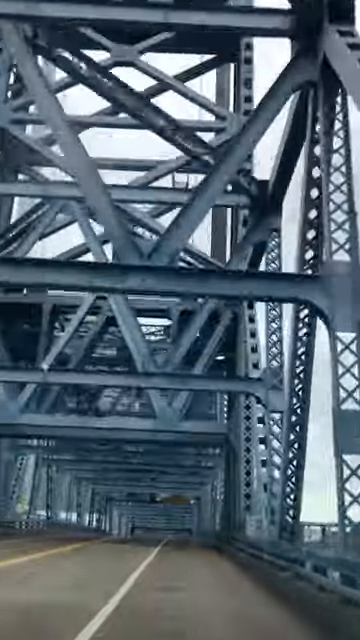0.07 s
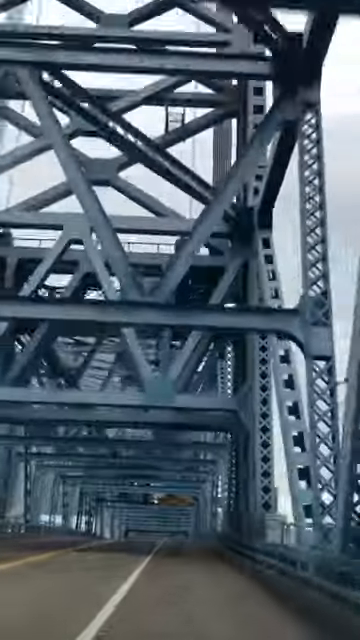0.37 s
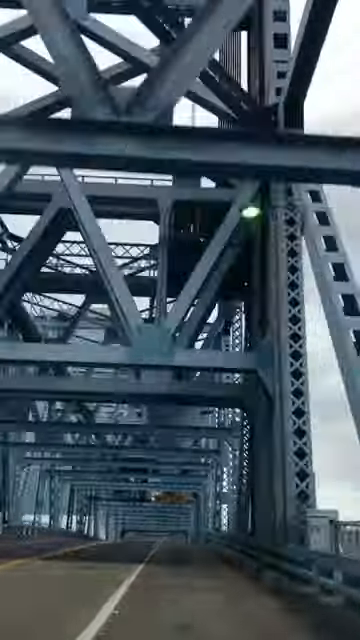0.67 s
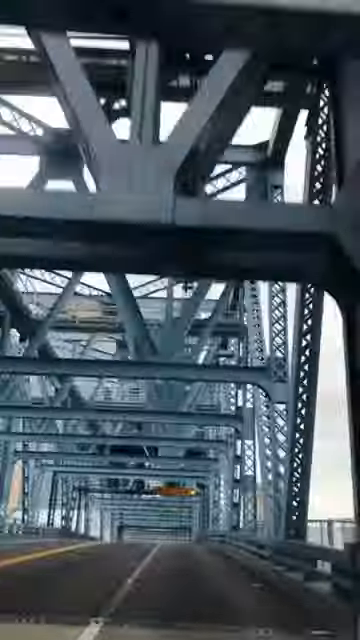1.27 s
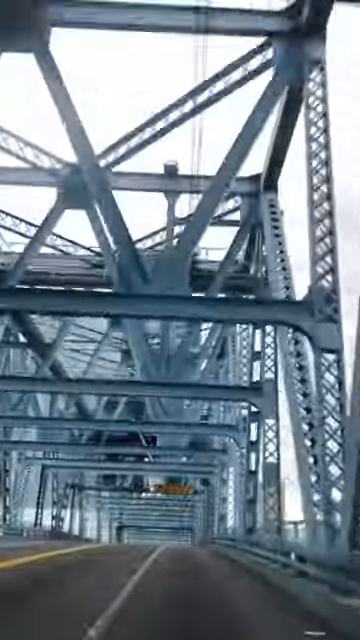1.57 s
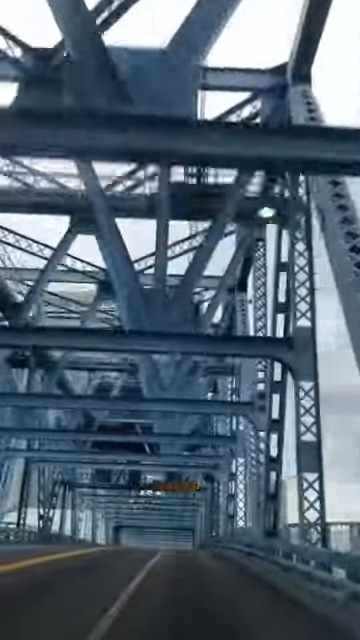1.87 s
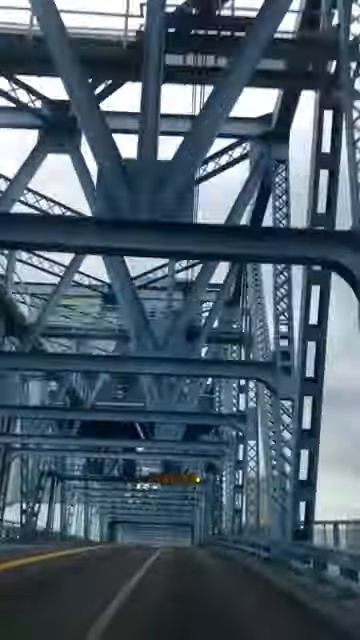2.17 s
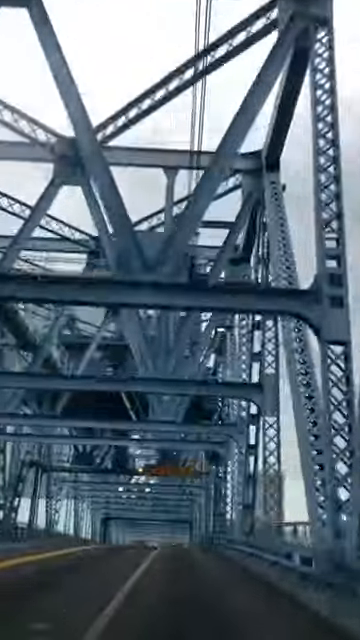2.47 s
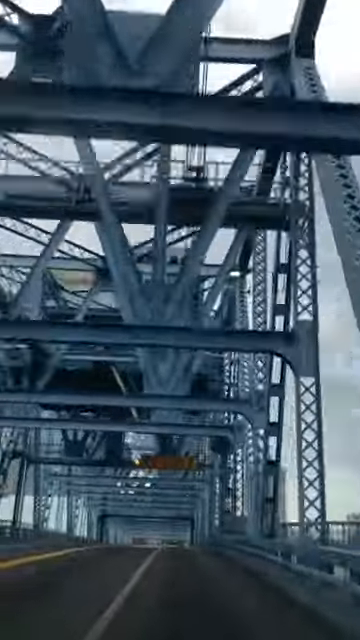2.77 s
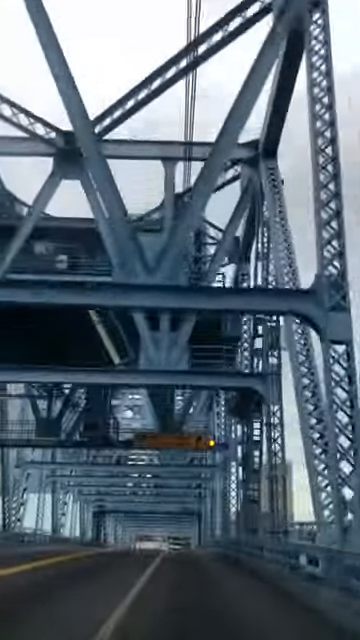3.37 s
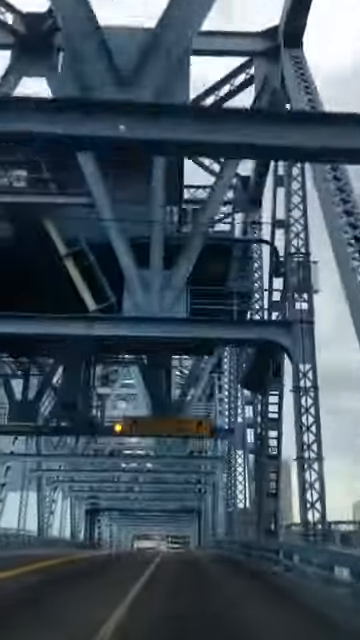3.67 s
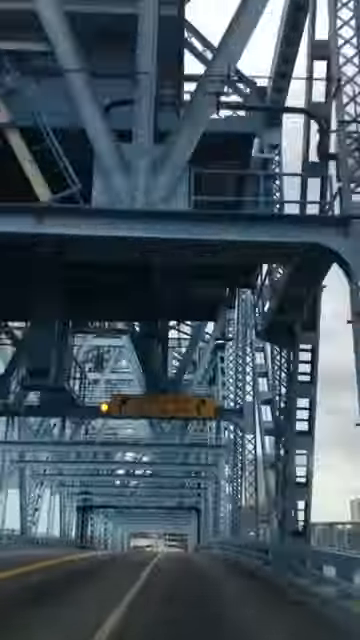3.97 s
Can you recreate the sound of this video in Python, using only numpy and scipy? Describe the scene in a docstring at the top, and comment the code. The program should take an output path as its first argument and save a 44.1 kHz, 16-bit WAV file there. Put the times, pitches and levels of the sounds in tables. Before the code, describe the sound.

Road rumble heard inside a car, then tyres droning loudly over a ribbed bridge deck

```python
"""Car crossing a steel bridge

Inside a gently slowing car, tyres roar on concrete and shake the cabin over faint drivetrain tones.
The car clatters over a joint onto a ribbed deck: the roar dulls and the ribs drum the tyres into
a loud, low drone. The drone sets the trim buzzing and a small loose metal part jingling."""
import sys
import numpy as np
from scipy import signal
from scipy.fft import rfft, irfft
from scipy.io import wavfile

SR = 44100
rng = np.random.default_rng(int(sys.argv[2]) if len(sys.argv) > 2 else 0)


def persist_wave(psi):
    """Save psi, clipped to +-1, as 16-bit WAV."""
    counts = np.round(np.clip(psi, -1, 1) * 32767).astype(np.int16)
    wavfile.write(sys.argv[1], SR, np.atleast_2d(counts).T)


N = 176400

# road speed, as ribs passing under a tyre (time [s], rate [Hz])
RIB_RATE = [(0, 97.8), (1.0, 98.08), (1.9, 95.2), (2.3, 92.88), (2.9, 91.02), (3.25, 90.86), (3.55, 88.95),
            (4, 87.23)]
DECK_START_S, DECK_BLEND_S = 1.65, .16  # midpoint and length of the cabin and drivetrain crossfade

# tyre roar on each surface: colour (frequency [Hz], relative level [dB]), fader (time [s], level [dB])
CONCRETE_COLOUR = [(200, -5.5), (450, 7), (720, -1.5), (900, 1.5), (1120, -0.5), (1280, -8), (1500, -6),
                   (1820, -8), (2150, -16), (2600, -21), (3000, -20), (3600, -28), (4800, -34.5),
                   (7000, -47), (9500, -55), (11000, -58), (16000, -63)]
CONCRETE_LEVEL = [(0, -33.5), (1.0, -34.5), (1.55, -34.5), (1.8, -40), (2.1, -48.5), (2.7, -56), (4, -65.5)]
DECK_COLOUR = [(200, -5.5), (450, 1.5), (700, -3.5), (1000, -7), (1500, -15.5), (2100, -22), (3000, -27.5),
               (4000, -33), (6000, -42), (12000, -52.5), (16000, -55.5)]
DECK_LEVEL = [(0, -82), (1.55, -42), (1.72, -35), (2.151, -31), (2.5, -34.5), (2.7, -36.5), (3.05, -35.5),
              (3.3, -37.5), (3.701, -38), (4, -37.5)]

# cabin resonances (frequency [Hz], width [Hz], level on concrete [dB], level on the deck [dB])
CABIN_MODES = [(51.4, 4.8, -29, -31.5), (88.7, 12, -26, -24), (127.3, 25, -29.5, -28.5),
               (191.7, 14, -32, -28.5), (241.3, 28, -31.5, -38), (276.6, 22, -37.5, -32.5),
               (384.3, 26, -37, -44.5), (894, 22, -49, -58.5), (1452, 77, -51, -65)]
# body rumble: colour (frequency [Hz], relative level [dB]), fader (time [s], level [dB])
RUMBLE_COLOUR = [(18, -31), (28, -18), (38, 6.5), (60, 5), (120, 5), (220, 2), (330, -5), (480, -4),
                 (700, -17.5), (1500, -61)]
RUMBLE_LEVEL = [(0, -25.5), (.85, -26), (1.1, -27.5), (1.5, -27), (1.75, -20), (1.9, -20), (2.1, -21),
                (2.7, -25.5), (3.3, -29), (4, -30)]
# drivetrain tones (multiple of the rib rate, level on concrete [dB])
DRIVETRAIN_TONES = [(1.92, -35.5), (2.54, -37), (4.47, -38), (6.08, -42), (9.13, -58.5)]

# colour of the ever-present trim ticks (frequency [Hz], relative level [dB])
TICK_COLOUR = [(5000, -1.5), (7500, -2.5), (9000, 1.5), (11000, -9.5), (15000, -10)]
# road bumps thumping the body (time [s], level [dB], pitch [Hz], decay [s])
BUMPS = [(0.099, -22.5, 278.4, 0.027), (0.116, -18, 191, 0.018), (0.257, -17.5, 92.3, 0.019),
         (.535, -23, 253, 0.036), (0.596, -14, 95, 0.057), (0.971, -18, 262, 0.037),
         (1.011, -12, 90, 0.031), (1.15, -20.5, 51, 0.043), (1.4, -22, 293, 0.018), (1.72, -23, 190, 0.035),
         (1.87, -16, 49.8, .05)]
# knocks in the trim (time [s], level [dB], decay [s], centre [Hz])
KNOCKS = [(.108, -64, .003, 9000), (.124, -63, .003, 9000), (.381, -61, .012, 9500),
          (.432, -68, .005, 10000), (.547, -63, .004, 9000), (.598, -68, .02, 9500),
          (.945, -52.5, 0.0048, 2500), (1.104, -58, 0.0075, 5000), (1.281, -62, .005, 6050),
          (1.712, -56, 0.0055, 5500), (1.737, -54, 0.0077, 6000), (2.168, -50, .012, 4000),
          (2.228, -56, .012, 5900), (2.712, -51, .008, 5500), (3.53, -63, .01, 4450)]
KNOCK_ATTACK_S = .0034

# faders for the drone's fundamental, octave and overtones (time [s], level [dB])
FUNDAMENTAL_LEVEL = [(0, -50), (1.55, -38.5), (1.775, -19), (1.805, -8), (1.86, -18.5), (1.92, -10.5),
                     (2.04, -9.5), (2.15, -7), (2.22, -9), (2.32, -5), (2.38, -11.5), (2.44, -6),
                     (2.5, -9.5), (2.56, -4.5), (2.66, -9.5), (2.71, -5.5), (2.78, -10.5), (2.87, -6),
                     (2.94, -9.5), (3.03, -8), (3.08, -17.5), (3.24, -10), (3.34, -19), (3.41, -12),
                     (3.48, -17), (3.62, -11), (3.72, -16.5), (3.8, -11.5), (3.88, -15.5), (4, -10.5)]
OCTAVE_LEVEL = [(0, -67), (1.5, -50), (1.72, -20.5), (1.82, -32), (1.93, -25.5), (2.04, -19.5), (2.15, -22),
                (2.28, -29), (2.41, -12.5), (2.5, -23.5), (2.7, -24.5), (3.0, -27.5), (3.2, -29.5),
                (3.38, -34), (3.56, -26), (3.7, -30.5), (4, -29.5)]
OVERTONE_LEVEL = [(0, -67), (1.7, -38), (2.0, -28.5), (2.35, -26), (2.6, -30.5), (2.95, -31), (3.25, -40),
                  (3.5, -29), (3.68, -37), (3.82, -32), (4, -34)]
# balance of the overtones (multiple of the rib rate, relative level [dB])
OVERTONES = [(3, -1), (4, -4.5), (5, -14.5), (6, -17), (7, -20.5)]
FLUTTER_HZ = 9

# hits on the deck joint (time [s], level [dB], decay [s])
JOINT_HITS = [(1.843, -42.5, 0.019), (1.857, -37.5, 0.038)]
# their colour (frequency [Hz], relative level [dB])
JOINT_COLOUR = [(600, -4), (1200, 6.5), (2500, -7), (4000, -11), (6500, -16), (9500, -18.5), (12000, -24),
                (15500, -24.5)]
# trim buzz: colour (frequency [Hz], relative level [dB]), fader (time [s], level [dB])
BUZZ_COLOUR = [(1200, -6), (3000, 6.5), (4800, 0.5), (6500, -4.5), (9000, -4.5), (12000, -10.5),
               (15000, -10)]
BUZZ_LEVEL = [(0, -86), (1.68, -83), (1.73, -71), (1.82, -69), (1.88, -51.5), (2.0, -58), (2.2, -56.5),
              (2.36, -60.5), (2.45, -55), (2.78, -59.5), (2.86, -53), (2.93, -56.5), (3.06, -54),
              (3.1, -66), (3.35, -66.5), (3.53, -60.5), (3.68, -67), (3.82, -63), (4, -57)]
# jingles of the loose metal part (time [s], level [dB])
JINGLES = [(1.858, -49), (1.978, -53), (2.008, -51.5), (2.088, -57.5), (2.229, -54), (2.484, -56.5),
           (2.555, -52), (2.616, -53), (2.75, -56.5), (2.841, -51), (2.878, -68), (2.965, -71),
           (3.005, -54), (3.042, -55), (3.069, -51.5), (3.187, -51), (3.356, -57), (3.478, -62.5),
           (3.749, -69.5), (3.824, -62)]
# its ring (frequency [Hz], width [Hz], relative level [dB])
METAL_MODES = [(13500, 600, -7.5), (14450, 550, -1.5), (15100, 650, -3), (9500, 5000, -4)]

TIME = np.arange(N) / SR
BIN_HZ = np.arange(N // 2 + 1) * SR / N


def undb(db):
    """Decibels to gain."""
    return 10 ** (np.asarray(db) / 20)


def unit(x):
    """Scale to rms 1."""
    return x / np.sqrt(np.mean(x ** 2) + 1e-20)


def curve(rows):
    """Automation: straight lines through (time [s], value) points."""
    return np.interp(TIME, *np.array(rows, float).T)


def noise():
    """White noise."""
    return rng.standard_normal(N)


def colour(x, points):
    """EQ x to a colour table, falling 18 dB per octave below its first point; rms 1."""
    octave = np.log2(np.maximum(BIN_HZ, 1))
    hz, db = np.array(points, float).T
    low_cut_db = 18 * np.maximum(np.log2(hz[0]) - octave, 0)
    gain = undb(np.interp(octave, np.log2(hz), db) - low_cut_db)
    return unit(irfft(rfft(x) * gain, N))


def resonate(x, hz, width):
    """Ring x through a resonance with steep skirts; rms 1."""
    f = np.maximum(BIN_HZ, 1)
    detuning = (f / hz - hz / f) * hz / width
    return unit(irfft(rfft(x) / (1 + .5j * detuning) ** 2, N))


def wander(rate_hz):
    """Smooth random modulation up to about this rate; rms 1."""
    return unit(irfft(rfft(noise()) * np.exp(-(BIN_HZ / rate_hz) ** 2), N))


def rough_tone(phase, rough=.45):
    """A tone whose level and phase flutter."""
    flutter = wander(FLUTTER_HZ) * np.cos(phase) + wander(FLUTTER_HZ) * np.sin(phase)
    return np.sqrt(2 / (1 + rough ** 2)) * (np.cos(phase) + rough * flutter / np.sqrt(2))


def burst(peak_s, attack_s, decay_s):
    """Envelope that swells to its peak and dies away."""
    t = TIME - peak_s
    return np.exp(np.maximum(np.minimum(t / attack_s, -t / decay_s), -30))


def tyre_roar(spectrum, level, flicker_db=1.15, flicker_hz=18):
    """Tyres rolling on one road surface make a flickering roar."""
    return colour(noise(), spectrum) * undb(curve(level) + flicker_db * wander(flicker_hz))


def cabin(on_deck):
    """The uneven road shakes the body and rings the cabin's resonances."""
    booms = sum(resonate(noise(), hz, width) * undb(concrete_db + (deck_db - concrete_db) * on_deck)
                for hz, width, concrete_db, deck_db in CABIN_MODES)
    rumble = colour(noise(), RUMBLE_COLOUR) * undb(curve(RUMBLE_LEVEL))
    return booms + rumble


def drivetrain(rib_phase, on_deck, duck_db=-7.5):
    """Faint tones that sink in pitch as the car slows and duck on the deck."""
    tones = sum(undb(db) * rough_tone(k * rib_phase, rough=.77) for k, db in DRIVETRAIN_TONES)
    return undb(duck_db * on_deck) * tones


def trim_ticks(per_s=87, scatter_db=2.5, decay_s=.0031):
    """Loose trim makes sparse, uneven contacts, each a tiny decaying crackle."""
    hits = (rng.random(N) < per_s / SR) * undb(scatter_db * np.minimum(rng.exponential(size=N), 3))
    envelope = signal.lfilter([1], [1, -np.exp(-1 / (decay_s * SR))], hits)
    return unit(envelope * noise())


def bumps(attack_s=.0092):
    """Each bump rings one low resonance of the body."""
    return sum(undb(db) * burst(at, attack_s, decay) * np.sqrt(2) * np.sin(2 * np.pi * hz * (TIME - at))
               for at, db, hz, decay in BUMPS)


def trim_knocks():
    """Jolted panels knock: short, bright cracks of broad noise."""
    crack = noise()
    return sum(undb(db) * burst(at, KNOCK_ATTACK_S, decay) * resonate(crack, hz, width=min(hz, 4000))
               for at, db, decay, hz in KNOCKS)


def trim_squeak(level_db=-58.5):
    """The trim gives one thin, brief squeak."""
    envelope = burst(peak_s=.396, attack_s=.008, decay_s=.016)
    return undb(level_db) * envelope * resonate(noise(), hz=6600, width=350)


def rib_drone(rib_phase, wobble_db=.3, jitter_rad=.07):
    """Each rib gives the tyres one push: a strong, clean fundamental under fluttering harmonics."""
    fundamental = np.sqrt(2) * np.cos(rib_phase + jitter_rad * wander(FLUTTER_HZ))
    fundamental *= undb(curve(FUNDAMENTAL_LEVEL) + wobble_db * wander(FLUTTER_HZ))
    octave = rough_tone(2 * rib_phase) * undb(curve(OCTAVE_LEVEL))
    overtones = sum(undb(db) * rough_tone(k * rib_phase) for k, db in OVERTONES)
    return fundamental + octave + overtones * undb(curve(OVERTONE_LEVEL))


def joint_clatter():
    """The car clatters over the joint between the two decks."""
    envelope = sum(undb(db) * burst(at, KNOCK_ATTACK_S, decay) for at, db, decay in JOINT_HITS)
    return colour(noise(), JOINT_COLOUR) * envelope


def trim_buzz(rib_phase, grains_per_s=1100, scatter_db=1.5, pulse_depth=.13, flicker_db=1.5):
    """Panels chatter: grains, hiss and ticks pulse in step with the drone."""
    grains = (rng.random(N) < grains_per_s / SR) * noise()
    grains *= undb(scatter_db * np.minimum(rng.exponential(size=N), 4))
    chatter = unit(unit(grains) + noise()) + undb(-3) * trim_ticks()
    chatter *= 1 + pulse_depth * np.sin(rib_phase)
    return colour(chatter, BUZZ_COLOUR) * undb(curve(BUZZ_LEVEL) + flicker_db * wander(rate_hz=30))


def loose_metal():
    """Short flurries of contacts ring a tiny metal part."""
    contacts = noise() * undb(4 * wander(rate_hz=200))
    ring = unit(sum(undb(db) * resonate(contacts, hz, width) for hz, width, db in METAL_MODES))
    return ring * sum(undb(db) * burst(at, attack_s=.006, decay_s=.016) for at, db in JINGLES)


def scene():
    """The mono mix, heard from behind the windscreen."""
    rib_phase = 2 * np.pi * np.cumsum(curve(RIB_RATE)) / SR
    on_deck = np.clip(.5 + (TIME - DECK_START_S) / DECK_BLEND_S, 0, 1)  # 0 on concrete, 1 on the ribs
    roar = tyre_roar(CONCRETE_COLOUR, CONCRETE_LEVEL) + tyre_roar(DECK_COLOUR, DECK_LEVEL)
    bed = roar + cabin(on_deck) + drivetrain(rib_phase, on_deck)
    ticks = undb(-79) * colour(trim_ticks(), TICK_COLOUR)
    jolts = bumps() + trim_knocks() + trim_squeak()
    deck = rib_drone(rib_phase) + joint_clatter() + trim_buzz(rib_phase) + loose_metal()
    return (bed + ticks + jolts + deck)[None]


def record(dry, ceiling=.93, top_hz=15800):
    """Soft-clip the loudest peaks and cut the extreme treble."""
    rounded = dry / (1 + (dry / ceiling) ** 12) ** (1 / 12)
    high_cut = signal.ellip(10, .2, 80, top_hz, fs=SR, output="sos")
    return signal.sosfilt(high_cut, rounded)


dry = scene()
out = record(dry)
persist_wave(out)
```